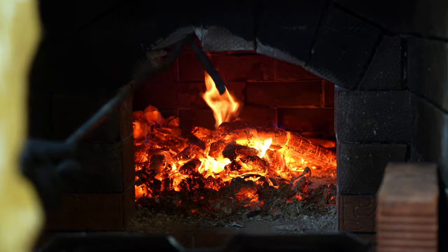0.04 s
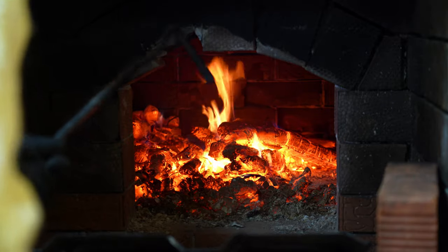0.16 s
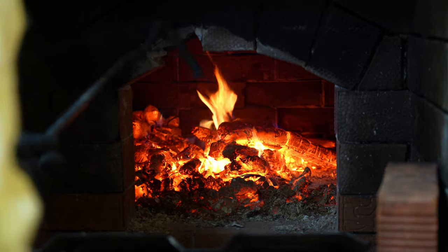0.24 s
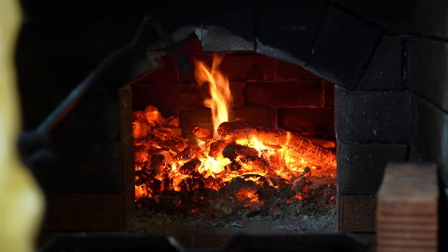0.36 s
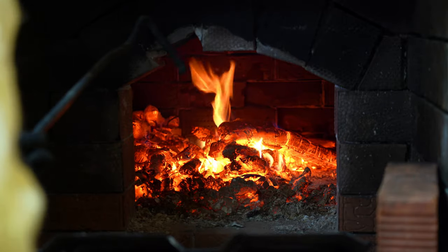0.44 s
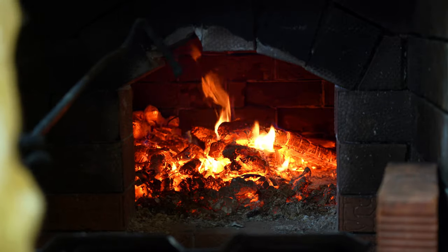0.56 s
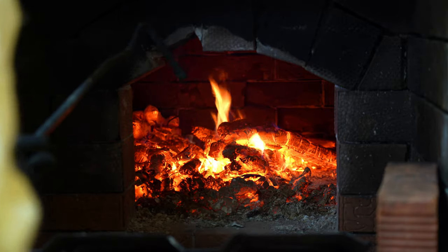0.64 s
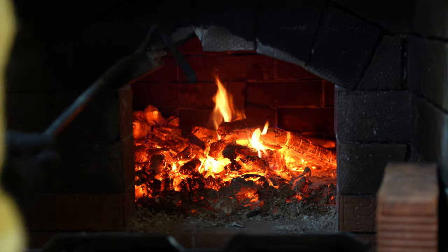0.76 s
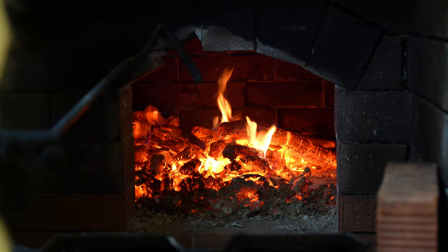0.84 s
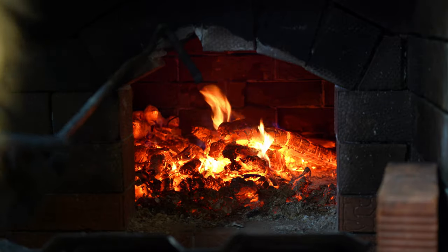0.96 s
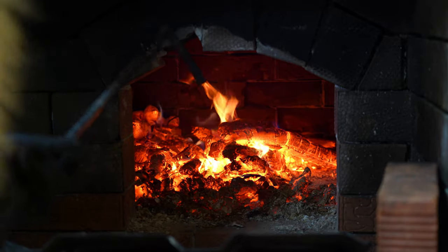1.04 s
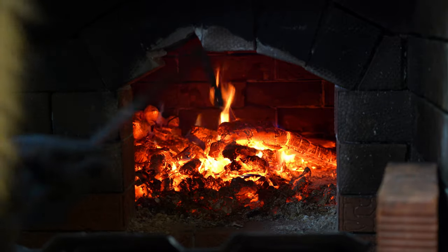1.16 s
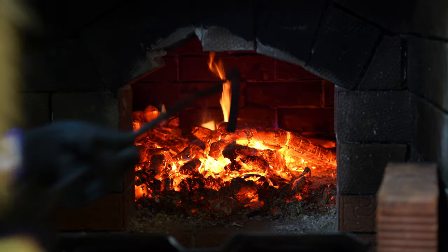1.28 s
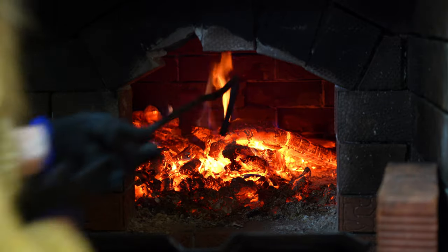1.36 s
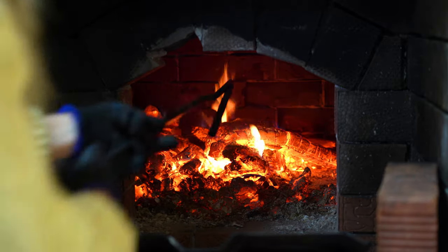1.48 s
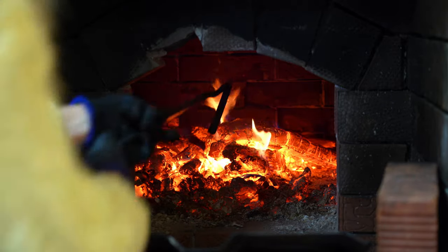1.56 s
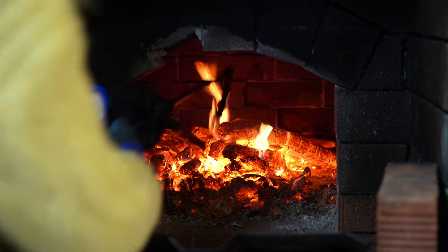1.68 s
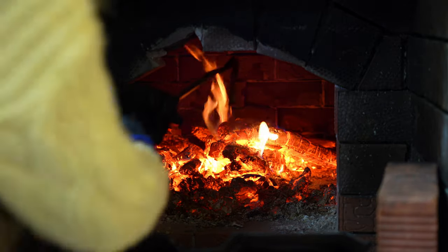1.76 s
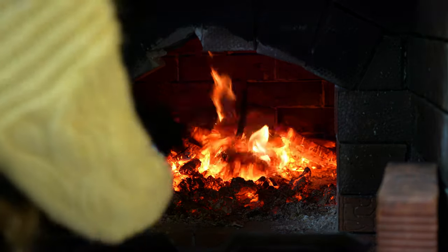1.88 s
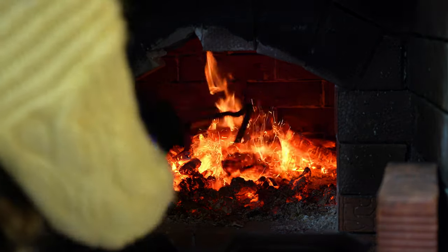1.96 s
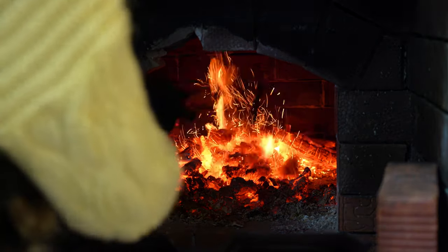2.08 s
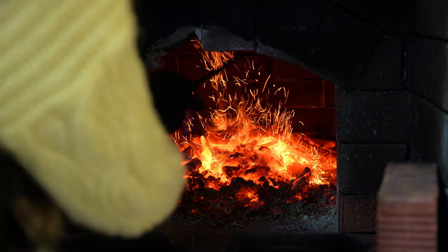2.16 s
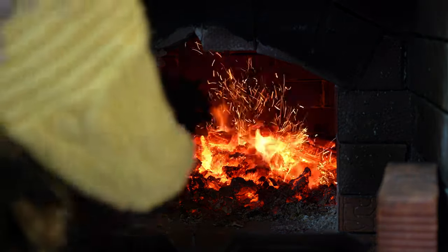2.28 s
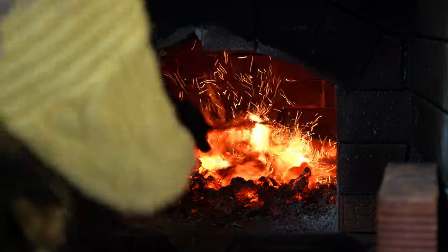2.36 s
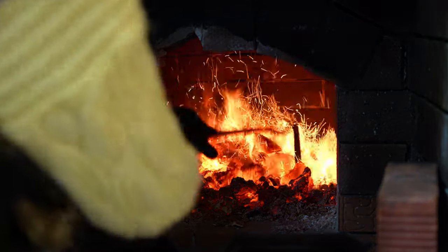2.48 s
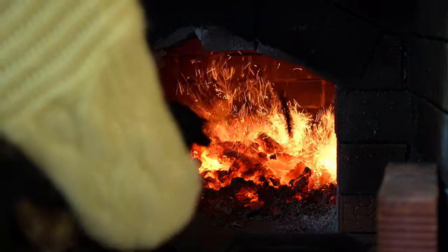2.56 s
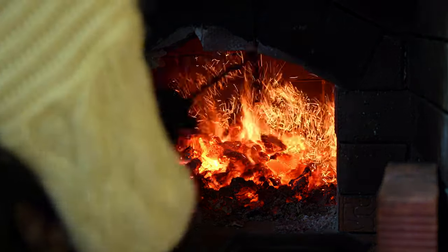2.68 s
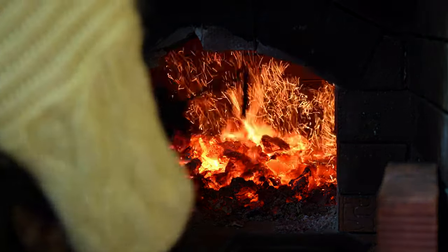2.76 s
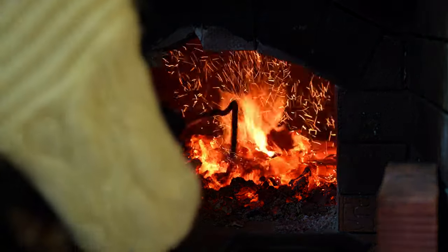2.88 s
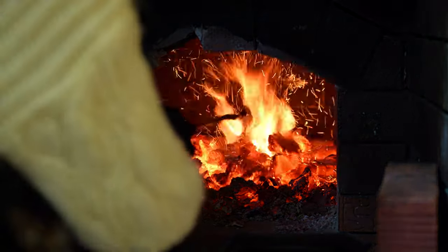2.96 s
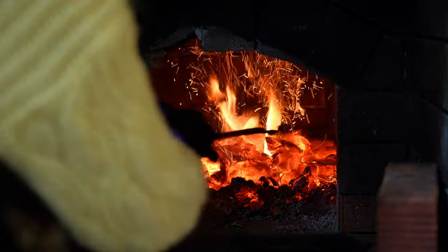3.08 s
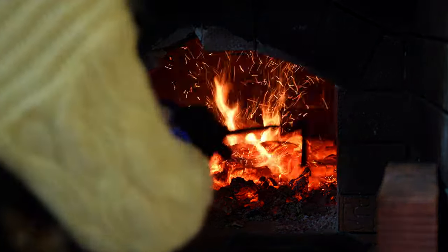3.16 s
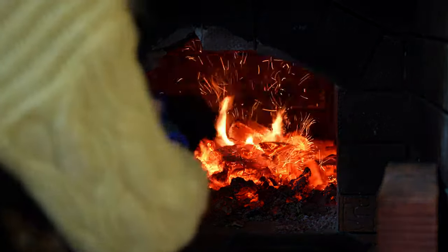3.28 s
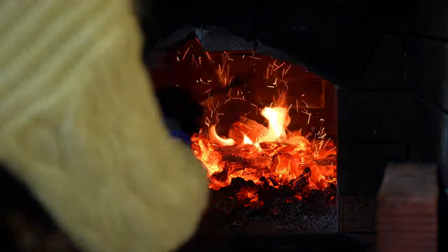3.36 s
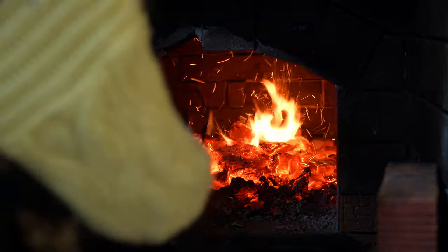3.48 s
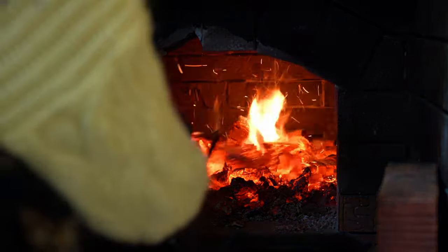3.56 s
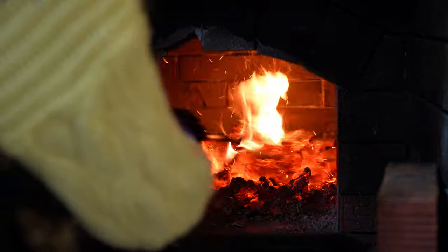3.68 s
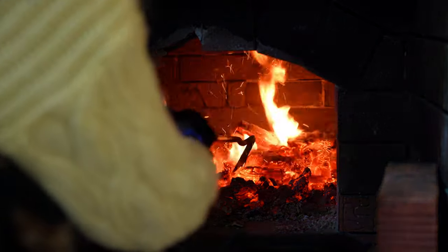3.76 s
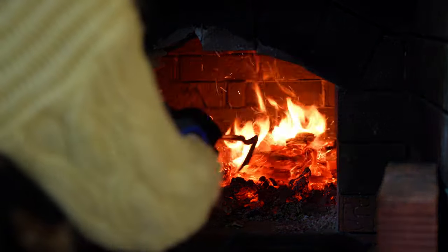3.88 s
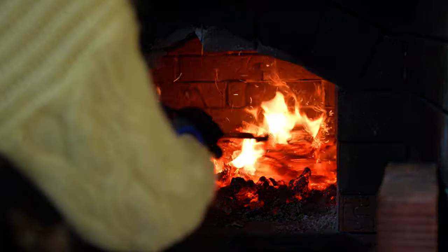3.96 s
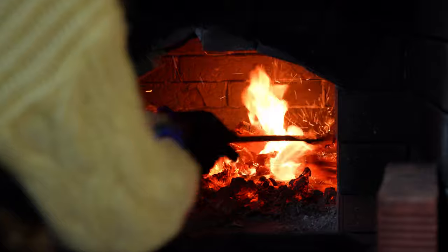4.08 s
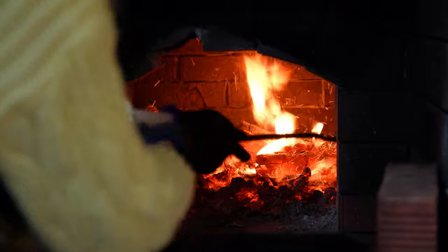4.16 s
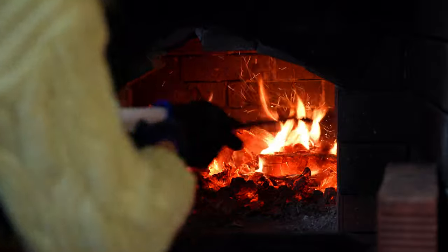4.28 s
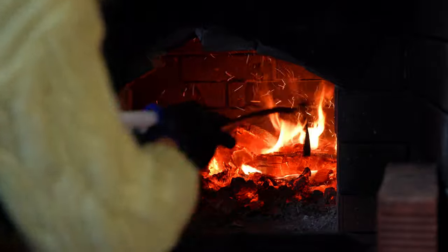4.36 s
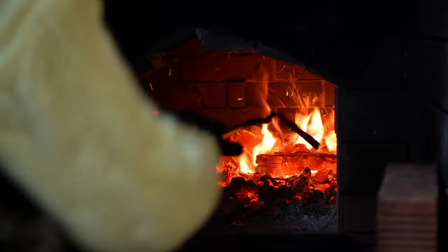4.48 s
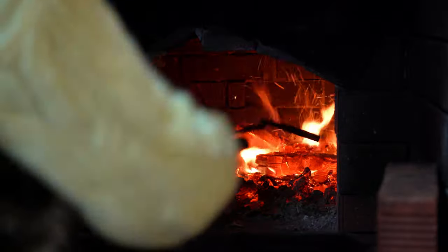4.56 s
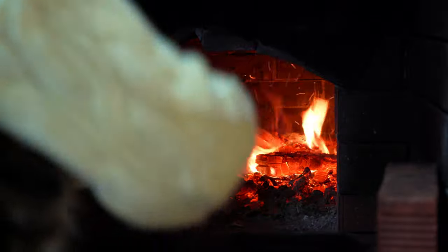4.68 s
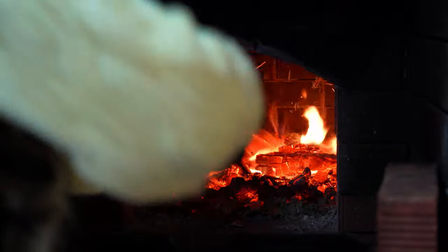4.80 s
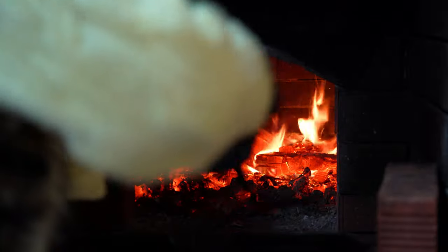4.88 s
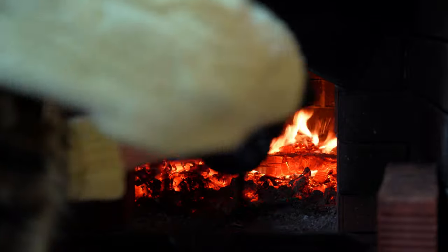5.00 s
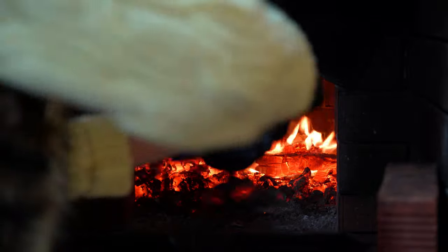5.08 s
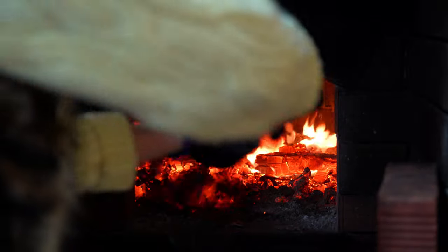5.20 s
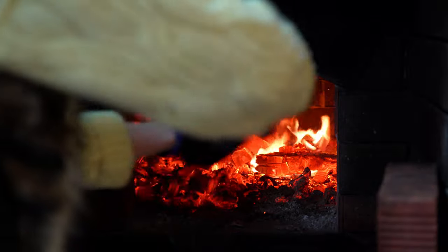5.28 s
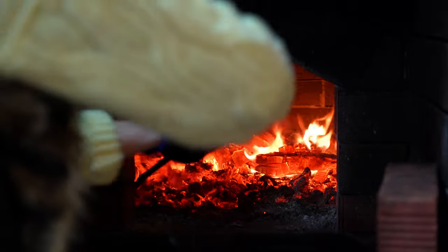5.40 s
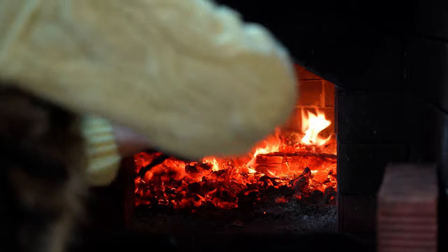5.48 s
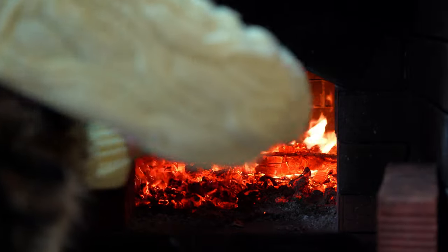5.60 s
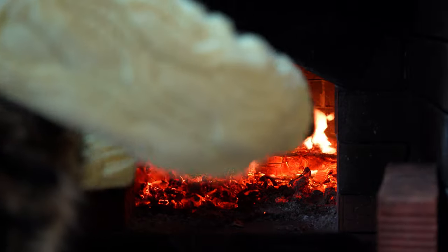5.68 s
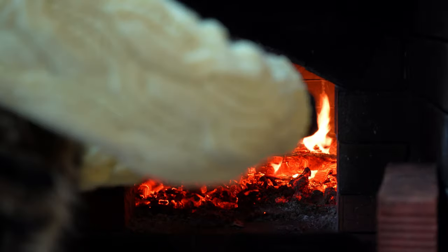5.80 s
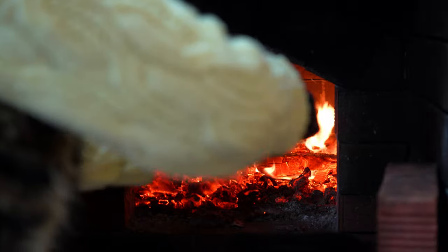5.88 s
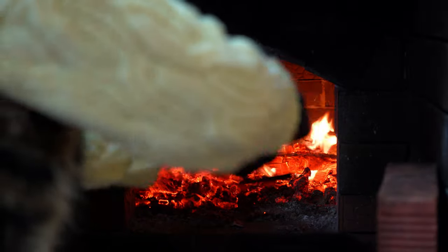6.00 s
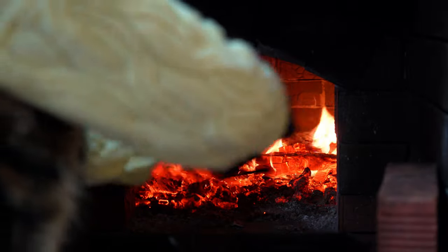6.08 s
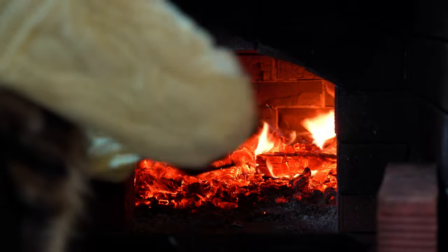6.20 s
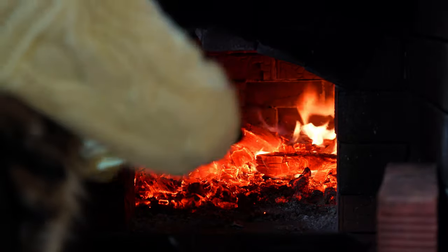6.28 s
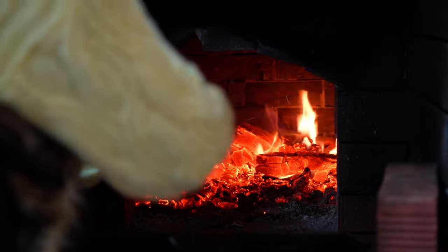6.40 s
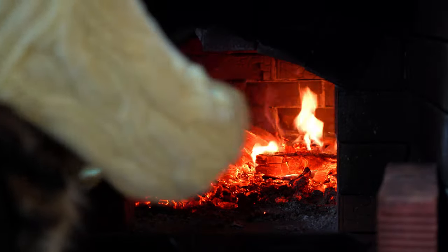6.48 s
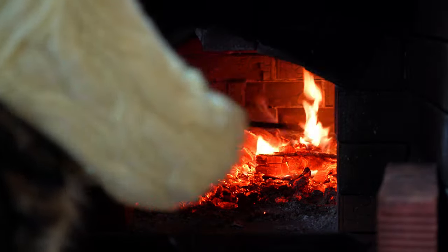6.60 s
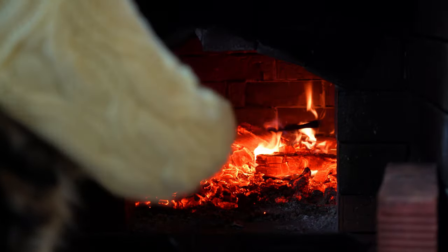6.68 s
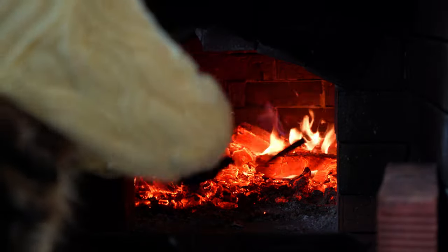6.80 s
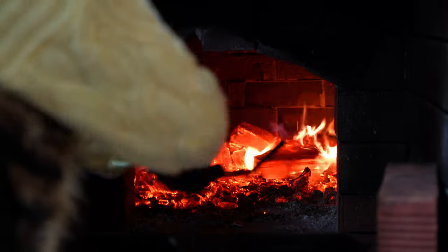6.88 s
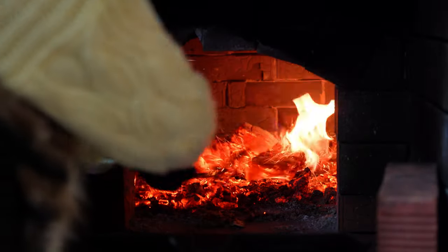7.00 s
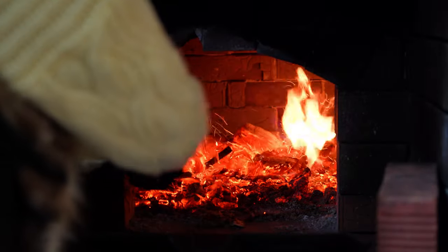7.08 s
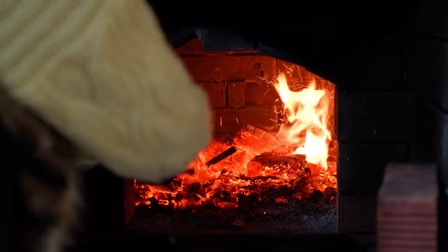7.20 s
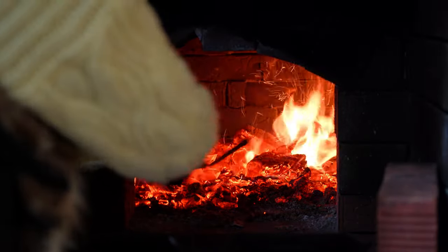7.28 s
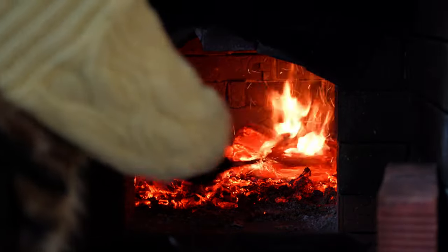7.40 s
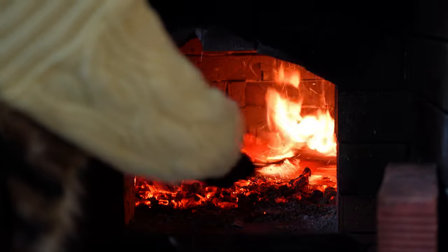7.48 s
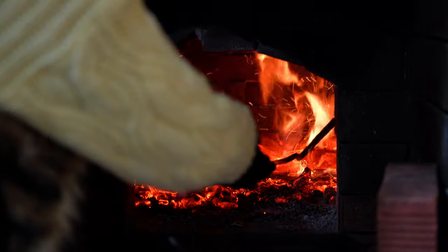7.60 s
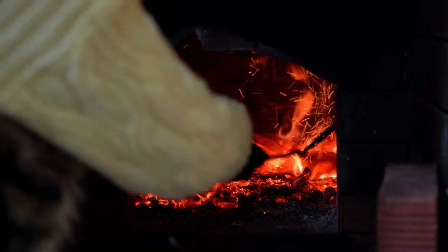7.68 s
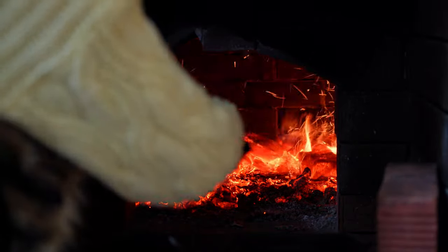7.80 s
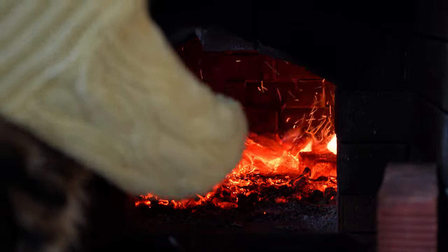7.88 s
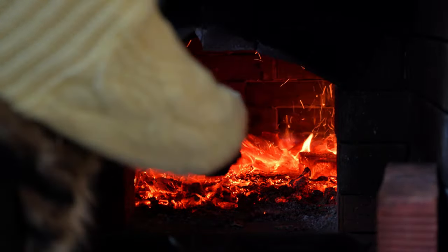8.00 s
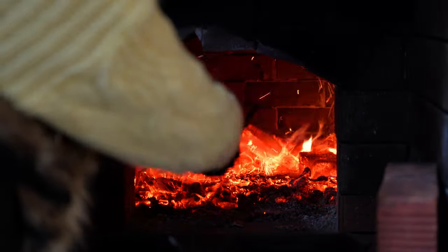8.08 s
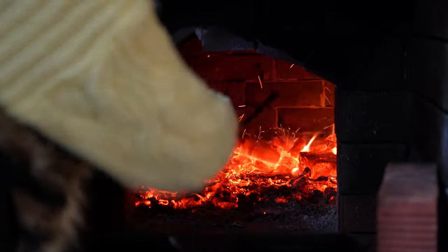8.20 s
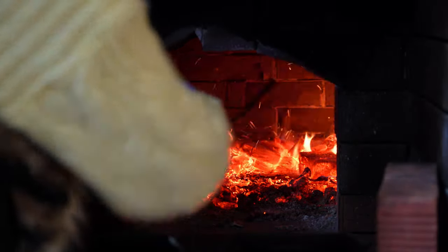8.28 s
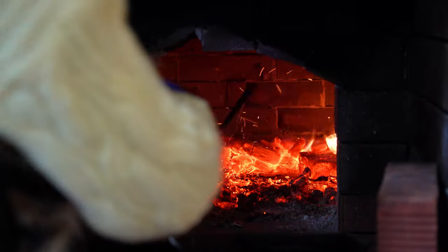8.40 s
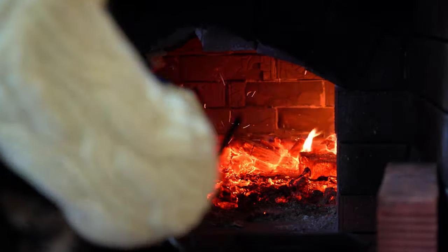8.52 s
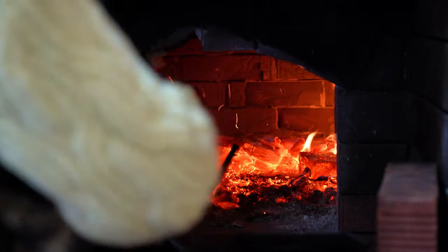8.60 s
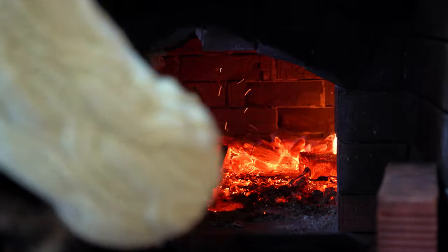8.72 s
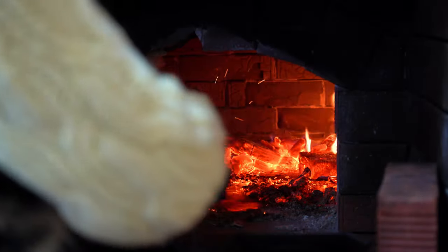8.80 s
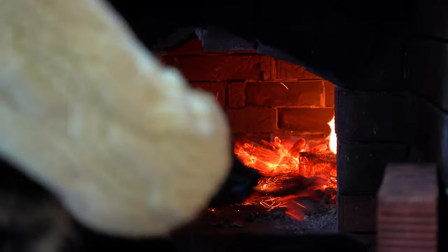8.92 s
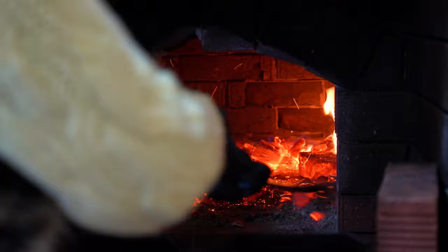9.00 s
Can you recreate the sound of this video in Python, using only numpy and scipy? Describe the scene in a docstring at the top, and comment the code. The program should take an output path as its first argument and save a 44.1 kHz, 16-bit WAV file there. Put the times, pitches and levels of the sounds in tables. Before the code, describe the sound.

A close, nearly dry perspective on a brick oven fire, with a very short faint echo and a weak steady hiss. At 0 s a low dull knock, then soft thuds near 0.35 and 0.9 s with slight metallic scrapes and sparse tiny crackles; a dry pop at 1.5 s. At 1.9 s a strong crunch of embers with sharp snaps and a deep thump, repeated louder at 2.35 s with a low whoosh of flame. Another crunch at 2.9 s, then pops and crumbling until 4 s. At 4.1 s a hollow knock and short bright iron rub; snaps around 4.6 s. At 5 s the loudest woody knock, followed by a jerky ringing metal drag until 5.35 s, and a thud at 5.4 s. Small crunches around 6-6.3 s, heavier raking with snaps at 6.85, 7.4 and 8 s, then gritty strokes and knocks at 8.65 and 8.9 s.

```python
"""In a brick oven an iron poker rakes glowing wood embers: charcoal crunches and snaps, logs and rod knock dully.
Crunch is a dense sum of short damped rings; snaps and pops are bursts of noise split into three bands.
Knocks are decaying sines with a thump; the singing iron is a bank of resonators fed with random clicks.
Below them the fire rumbles, roars and hisses faintly as filtered noise; feedback delays echo the near sounds.
"""
import sys
import numpy as np
from scipy import signal
from scipy.fft import rfft, irfft, next_fast_len
from scipy.io import wavfile
from scipy.ndimage import uniform_filter1d

SR = 44100
rng = np.random.default_rng(int(sys.argv[2]) if len(sys.argv) > 2 else 0)


def unload_wav(signal):
    """Save mono or channel-first audio to the path in sys.argv[1] as 16-bit WAV at rate SR, clipped to [-1, 1]."""
    wavfile.write(
        sys.argv[1],
        SR,
        np.round(np.clip(np.atleast_2d(signal).T, -1, 1) * 32767).astype(np.int16),
    )


N = 399105  # samples


def amp(db):
    """Level definition: the amplitude factor of a level in dB."""
    return 10 ** (np.asarray(db) / 20)


def rms_one(x):
    """Normalization: the signal scaled to an rms value of 1."""
    return x / np.sqrt(np.mean(x ** 2) + 1e-20)


def in_time(rows, outside=None):
    """Linear interpolation: each column of a time table, one value a sample."""
    times, *columns = np.transpose(rows)
    return [np.interp(np.arange(N) / SR, times, c, outside, outside) for c in columns]


def at_hz(points, hz):
    """Spectral envelope: levels in dB read on a log-frequency axis, -120 dB beyond the ends."""
    f, level = np.transpose(points)
    return np.interp(np.log(np.maximum(hz, 1)), np.log(f), level, -120, -120)


def coloured(x, spectrum):
    """Linear filtering: the spectrum of x is multiplied by the given envelope."""
    size = next_fast_len(len(x))
    gain = amp(at_hz(spectrum, np.fft.rfftfreq(size, 1 / SR)))
    return irfft(rfft(x, size) * gain, size)[:len(x)]


def drift(rate_hz):
    """Slow random modulation: white noise through two equal low-pass poles, scaled to rms 1."""
    r = np.exp(-2 * np.pi * rate_hz / SR)
    slow = signal.lfilter([1], [1, -2 * r, r * r], rng.standard_normal(N + SR))
    return rms_one(slow[SR:])  # the first second lets the filter settle


def ring(x, hz, t60):
    """Damped resonator: a unit click excites a sine of about height 1 that falls 60 dB in t60 seconds."""
    r, w = amp(-60 / (t60 * SR)), 2 * np.pi * hz / SR
    return signal.lfilter([0, np.sin(w)], [1, -2 * r * np.cos(w), r * r], x + 1e-18)


def clicks(per_s, spread_db):
    """Random impulse train: clicks of both signs, a few much larger than the rest."""
    sizes = amp(spread_db * np.minimum(rng.exponential(1, N), 5))
    signs = rng.choice([-1, 1], N)
    return sizes * signs * (rng.random(N) < per_s / SR)


def raking():
    """Energy addition: powers of strokes that swell, hold and settle, as dB of crunch, ash, rumble, roar."""
    # strokes of the hook: start t/s, swell/s, hold/s, then level/dB of crunch, fine ash,
    # rumble of shifting logs, roar of the fanned flames
    hook_strokes = [(0, 0.0017, 0.012, -42.5, -54, -36, -43), (.34, 0.007, 0.027, -65, -62, -35.5, -53),
                    (0.887, 0.017, 0.014, -68, -62, -36.5, -42.5),
                    (1.306, 0.066, 0.43, -52.5, -64, -58, -75),
                    (1.443, 0.01, 0.038, -44.5, -56, -49.5, -57),
                    (1.896, 0.011, 0.029, -30.5, -33.5, -31.5, -32.5),
                    (2.127, .02, 0.13, -56.5, -56, -49.5, -62),
                    (2.348, 0.0079, 0.046, -30.5, -33.5, -30, -27),
                    (2.867, 0.22, 0.017, -37.5, -35.5, -44, -39.5),
                    (3.517, 0.015, 0.071, -36.5, -41.5, -40, -60), (3.619, 0.055, .1, -37, -39.5, -37, -48),
                    (3.81, 0.12, 0.26, -43.5, -42.5, -46, -51),
                    (5.042, 0.047, 0.26, -40, -49.5, -38.5, -68),
                    (5.426, 0.013, 0.065, -50.5, -53.5, -39, -48),
                    (5.978, 0.011, 0.021, -38, -47, -46.5, -40),
                    (6.081, 0.018, 0.051, -36.5, -40.5, -45, -51),
                    (6.18, 0.023, 0.095, -37.5, -41.5, -44, -54), (6.324, 0.07, 0.45, -59, -60, -71, -66),
                    (6.482, 0.025, 0.072, -49.5, -60, -71, -72), (6.841, 0.0097, .28, -36, -42, -41.5, -50),
                    (7.401, 0.0043, 0.18, -38.5, -45, -42.5, -45.5),
                    (7.755, .07, 0.065, -71, -64, -54, -55), (8.008, 0.0072, 0.03, -38.5, -41.5, -42, -46),
                    (8.195, 0.1, 0.031, -67, -59.5, -51.5, -43), (8.658, .14, 0.13, -35.5, -38, -52, -62),
                    (8.911, 0.013, 0.085, -43, -41, -39.5, -39)]
    # settling rate/(dB/s) of crunch, ash, rumble, roar
    settle_db_per_s = (70, 85, 65, 57)
    # level at rest/dB of crunch, ash, rumble, roar
    rest_db = (-64, -65, -60, -57)
    swell_db = 25.5  # a stroke swells from this far below its level
    drop_db, drop_db_per_s = 6, 347  # extra quick drop as a stroke ends
    t = np.arange(0, N + 64, 64) / SR
    power = amp(2 * np.array(rest_db))[:, None] + 0 * t
    for s, swell, hold, *levels_db in hook_strokes:
        rising = swell_db * np.minimum((t - s) / max(swell, 1e-3) - 1, 0)
        after = np.maximum(t - s - swell - hold, 0)
        settling = np.outer(settle_db_per_s, after) + np.minimum(drop_db_per_s * after, drop_db)
        stroke_db = np.array(levels_db)[:, None] + rising - settling
        power = power + (t >= s) * amp(2 * stroke_db)
    return [np.interp(np.arange(N) / SR, t, 10 * np.log10(p)) for p in power]


def grains(spectrum, low_hz, high_hz, count=24):
    """Granular excitation: tiny fractures in clumps, each ringing briefly at one of many pitches; rms 1."""
    per_s, spread_db, cycles = 7000, 1, 28  # a grain falls 60 dB in this many cycles
    born = clicks(per_s * amp(4.0 * drift(30)), spread_db)
    dealt = rng.integers(0, count, N)
    total = 0
    for k, hz in enumerate(np.geomspace(low_hz, high_hz, count)):
        # a ring's energy grows with its length and the pitches thin out upward: hz evens both
        gain = hz * amp(at_hz(spectrum, hz))
        total = total + gain * ring(born * (dealt == k), hz, cycles / hz)
    return rms_one(total)


def crunch(body_db, ash_db):
    """Granular crushing: coarse ringing grains of shoved embers over fine ash with a few lone ticks."""
    # spectrum of the coarse charcoal: f/Hz, relative level per Hz/dB
    charcoal = [(350, -42), (600, -46), (943, 3.5), (1340, -6.5), (1500, 7), (1900, 0.5), (2640, 2),
                (3140, -5), (5250, 0), (7000, -28), (9100, -46), (15400, -120)]
    # spectral weighting of the ash: f/Hz, relative level per Hz/dB
    ash = [(4500, 4.5), (6500, 0.5), (9000, -1), (13000, 0.5), (15500, -1), (15900, -20)]
    ticks = amp(17) * clicks(30, 2)
    dust = clicks(6000 * amp(5.5 * drift(50)), 3) + ticks
    coarse = amp(body_db) * grains(charcoal, 773, 5870)
    return coarse + amp(ash_db) * rms_one(coloured(dust, ash))


def fractures(rows, crumb_levels_db):
    """Brittle fracture: a crack falling 60 dB in 1.2 ms, then crumbs that swell and die, in three bands."""
    out, t = np.zeros(N + SR), np.arange(SR // 5) / SR
    head = round(0.0018 * SR)  # samples
    band_edges_hz = ([1200, 2610], [3300, 5340], [6500, 16000])
    bands = [signal.butter(3, edges, "band", fs=SR, output="sos") for edges in band_edges_hz]
    for (s, peak_db, body_db, edge_db, t60), crumb_db in zip(rows, crumb_levels_db):
        noise, lump = rng.standard_normal((3, len(t))), rng.random(3)
        crack = (1 + 1.7 * noise[0]) * amp(-60 * t / 0.0012)
        fading = amp(-60 * t / max(t60, .01))
        uneven = noise[1] * amp(5.0 * noise[2])
        crumbs = amp(crumb_db) * uneven * (1 - np.exp(-t / 0.00048)) * fading
        body, middle, edge = (signal.sosfilt(band, crack + crumbs) for band in bands)
        edge[1:] += (1.2 * lump[2] - .6) * edge[:-1]  # duller or brighter from lump to lump
        edge *= fading ** 0.3  # the finest crumbs settle first
        # every lump has a size of its own and rings briefly from the crack
        body += 0.035 * ring(crack, 1400 + 1000 * lump[0], 0.025)
        middle += 0.055 * ring(crack, 3600 + 1900 * lump[1], 0.013)
        # body and edge levels are the rms of their loudest 1.8 ms
        loudest = [np.sqrt(uniform_filter1d(v ** 2, size=head).max()) for v in (body, edge)]
        one = middle / np.abs(middle).max()
        one = one + amp(body_db) * body / loudest[0] + amp(edge_db) * edge / loudest[1]
        at = round(s * SR)
        out[at:at + len(t)] += amp(peak_db) * one
    return out[:N]


def charcoal_snaps():
    """Brittle fracture of charcoal: cracks followed by a marked fall of crumbs."""
    # snaps: t/s, middle-band peak level/dB, body and edge level against that peak/dB, crumbs t60/s
    snap_rows = [(0.2778, -39, -13, -5, 0.046), (0.3192, -47.5, -9, 8, 0.051),
                 (0.3714, -38.5, -1, -3, 0.057), (0.719, -37.5, -4.5, -19, 0.041),
                 (0.8006, -46, -5, -23, 0.07), (0.9631, -36, -12, -4, 0.041),
                 (1.3093, -36.5, -7.5, -15, 0.047), (1.3304, -50, 0, -9, 0.07),
                 (1.8973, -16, -4.5, -6, 0.14), (1.9097, -11.5, 0.5, -11, 0.11),
                 (1.941, -20, 1, -10, 0.039), (1.9978, -34, 0, -10, 0.083), (2.021, -38, 8.5, -8, 0.1),
                 (2.1809, -41, -9, -7, 0.07), (2.2338, -51, 2, -12, 0.059),
                 (2.2698, -33.5, -13, -11, 0.061), (2.3457, -18.5, -8, -3.5, 0.07),
                 (2.356, -20, -2, -4, 0.11), (2.369, -8, -7, -10.5, 0.098), (2.3827, -11.5, -24, -5, 0.062),
                 (2.4834, -33.5, -3, -20, 0.07), (2.6515, -29.5, -8, -10, 0.058),
                 (2.8724, -17, -2, -10, 0.096), (2.966, -33.5, -5, -13, 0.081), (2.9872, -22, -7, -7, 0.04),
                 (3.0474, -28.5, -6, -1, 0.13), (3.0765, -21, -7, -2, 0.026),
                 (3.2524, -29.5, -19, 0.5, 0.075), (3.5817, -30.5, 9, -17, 0.026),
                 (3.707, -18.5, -16, -8.5, 0.05), (3.858, -37.5, -10, -1.5, 0.15),
                 (4.0337, -27.5, -35, -9, 0.07), (4.073, -24, -21, -10, 0.07),
                 (4.0943, -24.5, -2, -25, 0.076), (4.1709, -25, -9, -17, 0.057),
                 (4.2884, -57, 11, 16, 0.058), (4.3916, -41.5, -10, -1.5, 0.092),
                 (4.5276, -37, -8, -5, 0.064), (4.588, -27.5, -11, -8, 0.043),
                 (4.6046, -20, -9, -12, 0.058), (4.6281, -18.5, -6.5, -11.5, 0.052),
                 (4.912, -41.5, -6, -4, 0.13), (4.9859, -44.5, 17.5, -7, 0.11),
                 (5.434, -27.5, 2, -31, 0.095), (5.672, -39, -9, -14, 0.048), (5.7255, -45, -11, -4, 0.053),
                 (5.8295, -36, -2.5, 0, 0.07), (5.977, -40, 10.5, -16, 0.083),
                 (5.9857, -24, -2.5, -27, 0.11), (6.097, -34.5, 5, -16, 0.11), (6.109, -25, -2, -8, 0.044),
                 (6.12, -36, 7, -19, 0.04), (6.2178, -40, 6, 2, 0.12), (6.2558, -35, 3.5, 1, 0.088),
                 (6.342, -39.5, -9, 7, 0.074), (6.4996, -36.5, 2.5, -10, 0.053),
                 (6.8613, -23.5, -5.5, -8, 0.21), (6.9362, -20.5, -2.5, -20, 0.1),
                 (7.0183, -19, -4.5, -17, 0.075), (7.2938, -25.5, -17, -13, 0.09),
                 (7.4145, -19.5, -5.5, -14, 0.066), (7.4632, -22, -23, -26, 0.11),
                 (7.5561, -22.5, -4, -7.5, 0.087), (8.0193, -19, -13, -11, 0.12),
                 (8.0366, -17.5, -11, -10, 0.063), (8.2342, -31.5, -10.5, -6.5, 0.12),
                 (8.513, -41.5, -33, -4.5, 0.15), (8.6341, -36.5, 5.5, 0, 0.07),
                 (8.6413, -20.5, -3.5, -7, 0.11), (8.7064, -25.5, -16, -15, 0.056),
                 (8.9285, -15.5, -1, -11.5, 0.065)]
    return fractures(snap_rows, [-7.5] * len(snap_rows))  # crumbs against the crack, dB


def wood_pops():
    """Brittle fracture of burning wood: dry pops, nearly all crack."""
    # pops: t/s, middle-band peak level/dB, body and edge level against that peak/dB, crumbs t60/s
    pop_rows = [(1.0609, -36, -10, 0, 0.037), (1.203, -38.5, -22, 0, 0.071), (1.529, -19, -4, -6, 0.072),
                (2.141, -26, -12, -8, 0.046), (2.813, -26, -12.5, -1, 0.06),
                (3.0961, -15, -14.5, -7.5, 0.033), (3.1842, -32, -8, 3, 0.06), (3.2156, -34, -4, 1, 0.056),
                (3.2602, -25.5, -5.5, 1, 0.063), (3.4235, -26, -13.5, -1.5, 0.052),
                (3.4622, -28, -18, -0.5, 0.029), (3.5225, -21, -10, 0.5, 0.036),
                (3.5557, -25.5, -3, 6.5, 0.02), (5.2797, -18, -5.5, -14, 0.055),
                (5.4934, -45, -10, 11, 0.056), (5.6256, -46, 10.5, 2.5, 0.06),
                (5.7959, -24.5, -9.5, -9, 0.06), (5.9366, -49.5, 8, 9, 0.052), (6.4024, -46, -10, 4, 0.06),
                (6.54, -30.5, -7, -26, 0.06), (6.6886, -16.5, -14.5, -22.5, 0.062),
                (6.8545, -16.5, -14, -4, 0.053), (7.4076, -12.5, -7.5, -13, 0.074),
                (7.7139, -34, -7, -6, 0.077), (7.774, -53, -7, 15, 0.06), (7.9584, -40, -18, -2, 0.06),
                (8.0147, -13.5, -11, -2.5, 0.03), (8.1074, -37, -12, 2, 0.048)]
    return fractures(pop_rows, [-15.5] * len(pop_rows))  # crumbs against the crack, dB


def faint_snaps(count=30):
    """Random point process: small fractures at uniformly random moments, of random level and colour."""
    mean_db, spread_db, t60_s, crumbs_db = -48, 4, .05, -10
    when = rng.random(count) * N / SR
    size, body, edge = rng.standard_normal((count, 3)).T
    rows = zip(when, mean_db + spread_db * size, -10 + 5 * body, -6 + 5 * edge, [t60_s] * count)
    return fractures(rows, [crumbs_db] * count)


def knocks():
    """Soft impact: the struck pitch of log or rod and two overtones ring inside a thump of noise."""
    # dull knocks: t/s, peak level/dB, pitch f/Hz
    blows = [(.003, -25, 246), (0.342, -31, 173), (.373, -38, 183), (.893, -23, 197.4), (1.439, -38, 172),
             (1.895, -25.5, 190), (1.919, -20, 65.6), (1.945, -22, 131), (2.136, -31, 116),
             (2.346, -25.5, 84), (2.373, -16.5, 133), (2.871, -21.5, 131), (3.092, -28.5, 103),
             (3.44, -44.5, 397), (3.541, -42, 201), (3.567, -35, 233), (3.715, -31, 368), (3.746, -27, 448),
             (3.789, -29.5, 405), (3.965, -37.5, 490), (4.093, -18.5, 392), (4.991, -13, 427.6),
             (5.434, -20, 288), (5.983, -48, 167), (6.145, -35, 387), (6.253, -30.5, 374),
             (6.855, -37, 124), (7.049, -28, 148), (7.407, -36, 64), (7.468, -34, 127.6),
             (8.012, -28.5, 208), (8.641, -28.5, 218), (8.93, -27.5, 189)]
    t60_s, thump_db = 0.19, -3  # thump against the ring
    out, t = np.zeros(N + SR), np.arange(SR // 2) / SR
    for s, peak_db, hz in blows:
        shape = (1 - np.exp(-t / 0.00032)) * amp(-60 * t / t60_s)
        # a band around the struck pitch
        wood = signal.butter(2, [0.45 * hz, 120 + 1.63 * hz], "band", fs=SR, output="sos")
        thump = rms_one(signal.sosfilt(wood, rng.standard_normal(len(t))))
        overtones = 0.4 * np.sin(2 * np.pi * 1.6 * hz * t) + 0.5 * np.sin(2 * np.pi * 2.3 * hz * t)
        tone = np.sin(2 * np.pi * hz * t) + overtones * amp(-60 * t / 0.074)  # they die sooner
        one = shape * (tone + amp(thump_db) * thump)
        at = round(s * SR)
        out[at:at + len(t)] += amp(peak_db) * one / np.abs(one).max()
    return out[:N]


def iron(tables, resonances):
    """Modal excitation by friction: grit feeds the iron's modes, each gripping on its own; slips jolt all."""
    # the hook catches and jerks free: t/s, jolt level/dB
    slips = [(0.343, 3), (0.377, -8), (.39, 4), (.428, 3), (4.095, -5), (4.113, 7.5), (4.129, 7.5),
             (5.067, 12.5), (5.084, 14.5), (5.115, 6), (5.134, 6), (5.179, 10.5), (5.219, 2), (5.256, -15),
             (5.295, 0.5), (5.315, -1)]
    slip_t60_s = 0.033
    strokes = sum(amp(in_time(rows, -200)) for rows in tables)
    jolts = np.zeros(N)
    for s, jolt_db in slips:
        jolts[round(s * SR)] = amp(jolt_db)
    jolts = signal.lfilter([1], [1, -amp(-60 / (slip_t60_s * SR))], jolts + 1e-18)
    grit, modes = rms_one(clicks(3000, 1.9)), np.zeros((2, N))
    for hz, width, db in resonances:
        t60 = 2.2 / width  # a narrow resonance rings long
        grip = amp(2.8 * drift(18))
        evened = np.sqrt(width) / ring(grit, hz, t60).std()  # level per Hz independent of width
        high = int(hz > 3500)
        modes[high] += amp(db) * grip * evened * ring(grit * (.5 + jolts), hz, t60)
    return strokes[0] * rms_one(modes[0]) + strokes[1] * rms_one(modes[1])


def dragged_rod():
    """Friction-driven modes of a rod: the poker sings as it drags over brick."""
    # one table a stroke: t/s, low modes level/dB, high modes level/dB
    drag_strokes = [
        [(0.33, -70, -71), (0.346, -48.5, -56), (0.44, -55.5, -63), (0.53, -75, -77)],
        [(0.88, -66, -83), (0.892, -46, -46), (0.98, -80, -82)],
        [(5.05, -47.5, -48.5), (5.16, -41.5, -45), (5.19, -33, -39.5), (5.31, -30, -38.5), (5.37, -49, -62)],
    ]
    # modes of the rod: f/Hz, width/Hz, relative level/dB
    rod_modes = [(393, 29, -2), (727, 38, -15), (1170, 39, -11), (1700, 46, 0), (2930, 39, -11),
                 (3210, 35, -20), (3430, 16, -19), (3850, 37, -10), (4230, 47, -11), (4530, 53, -11),
                 (4820, 41, -15), (5170, 38, -7), (5460, 30, -13), (5870, 32, -15), (6240, 29, -24),
                 (6520, 31, -23), (7590, 33, -23), (8270, 41, -20), (9800, 80, -26), (10600, 39, -27),
                 (11100, 56, -26), (12200, 43, -25), (13000, 34, -28), (14200, 71, -28)]
    return iron(drag_strokes, rod_modes)


def rubbed_frame():
    """Friction-driven modes of a frame: the iron of the oven mouth sings as the rod rubs it."""
    # one table a stroke: t/s, low modes level/dB, high modes level/dB
    rub_strokes = [
        [(4.085, -39, -34), (4.095, -30.5, -33.5), (4.2, -64, -57)],
    ]
    # modes of the frame: f/Hz, width/Hz, relative level/dB
    frame_modes = [(1110, 38, -7), (1680, 20, -5), (1840, 47, -3), (2220, 110, -4), (2800, 51, 0),
                   (3200, 71, -7), (3730, 58, -1), (4240, 44, -3), (4510, 30, -10), (4810, 30, -4),
                   (5470, 100, -12), (6560, 37, -15), (6990, 35, -13), (7560, 39, -16)]
    return iron(rub_strokes, frame_modes)


def shifting_logs(rumble_db):
    """Filtered noise: the low rumble of shifting logs, its level wavering at random."""
    # rumble spectrum: f/Hz, relative level per Hz/dB
    logs = [(53, -32), (90, -16), (124, 2), (150, -1), (242, -2.5), (321, -11.5), (385, -5.5), (540, -14.5),
            (592, -12.5), (800, -32), (1040, -87), (1760, -120)]
    level = amp(rumble_db + 1.59 * drift(17.2))
    return level * rms_one(coloured(rng.standard_normal(N), logs))


def fanned_flames(roar_db):
    """Filtered noise: the deep roar of flames fanned by the strokes."""
    # roar spectrum: f/Hz, relative level per Hz/dB
    flames = [(13, -46), (22, -31), (54, 7), (70, 9.5), (86, -8.5), (110, 6.5), (140, -13), (240, -120)]
    return amp(roar_db) * rms_one(coloured(rng.standard_normal(N), flames))


def fire_hiss():
    """Stationary filtered noise: the faint steady hiss of the fire."""
    # hiss spectrum: f/Hz, relative level per Hz/dB
    fire = [(410, -11), (700, 15), (1360, 11), (1680, 9), (3390, 1), (5080, 0), (6680, -32), (15000, -29),
            (15800, -11)]
    return amp(-65) * rms_one(coloured(rng.standard_normal(N), fire))


def oven(x):
    """Reverberation by multiple reflection: ten feedback delays between brick walls, duller every round."""
    t60_s, brick_cut_hz = 0.25, 14700  # t60 at low frequencies
    size = next_fast_len(N + SR)
    hz = np.fft.rfftfreq(size, 1 / SR)
    dull = 1 / (1 + 1j * hz / brick_cut_hz)
    lags_s = np.geomspace(.0035, .021, 10) * rng.uniform(0.94, 1.05, 10)
    echoes = 0
    for k, lag in enumerate(lags_s):
        loop = amp(-60 * lag / t60_s) * dull * np.exp(-2j * np.pi * hz * lag)
        echoes = echoes + (-1) ** k * loop / (1 - loop)  # the sum of all rounds
    return irfft(rfft(x, size) * echoes, size)[:N]


def scene():
    """Superposition: the near sounds with the oven's echo, over rumble, roar and hiss."""
    body_db, ash_db, rumble_db, roar_db = raking()
    near = crunch(body_db, ash_db) + charcoal_snaps() + wood_pops() + faint_snaps()
    near = near + knocks() + dragged_rod() + rubbed_frame()
    echo = amp(-25) * oven(near)
    background = shifting_logs(rumble_db) + fanned_flames(roar_db) + fire_hiss()
    return (near + echo + background)[None]


def record(dry):
    """Saturation and low-pass filtering: the sharpest peaks are rounded, the top is cut."""
    cutoff_hz = 16950
    dry = .8 * np.tanh(dry / .8)
    return signal.sosfilt(signal.cheby2(12, 70, cutoff_hz, fs=SR, output="sos"), dry)


dry = scene()
out = record(dry)
unload_wav(out)
```